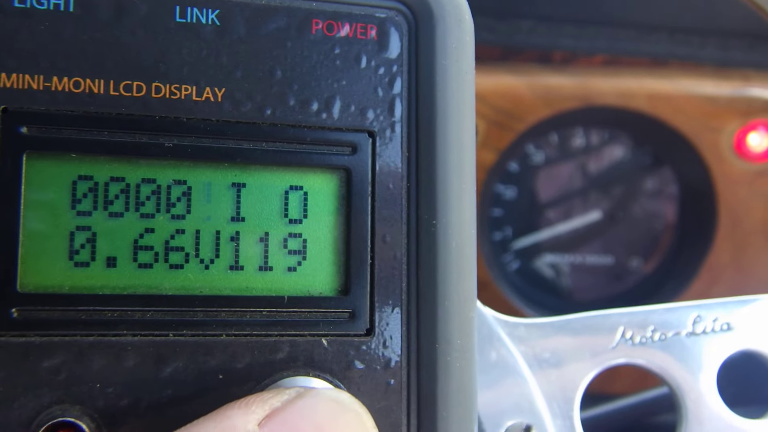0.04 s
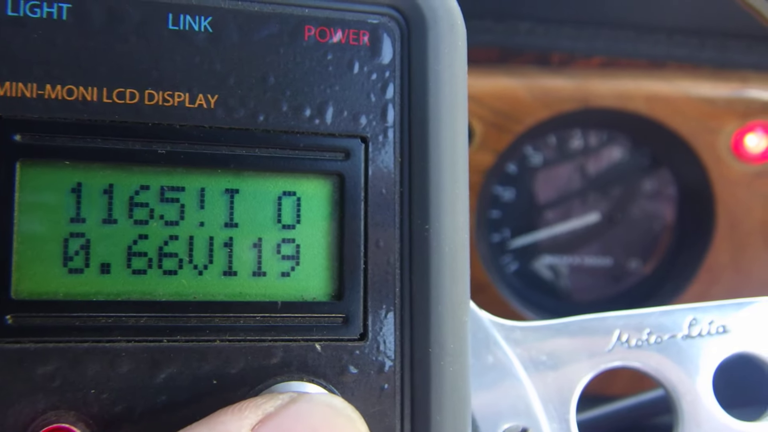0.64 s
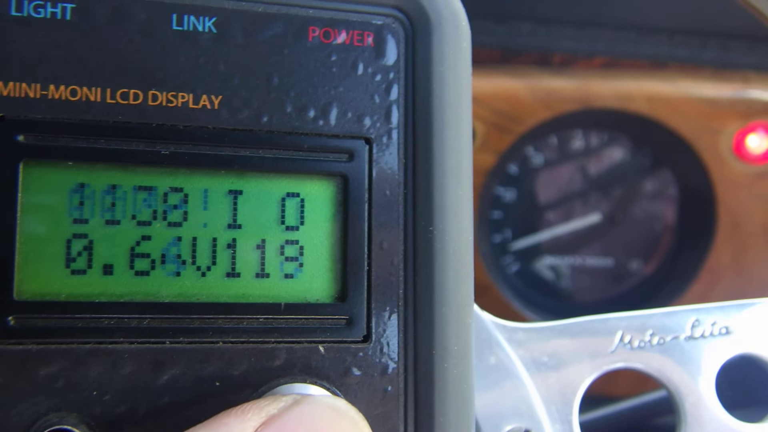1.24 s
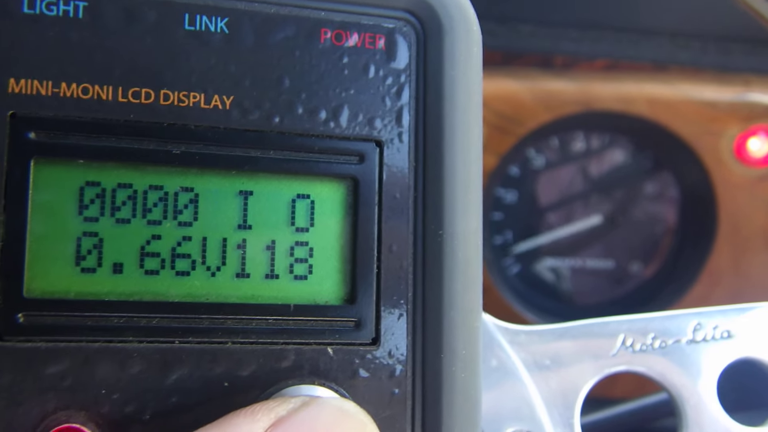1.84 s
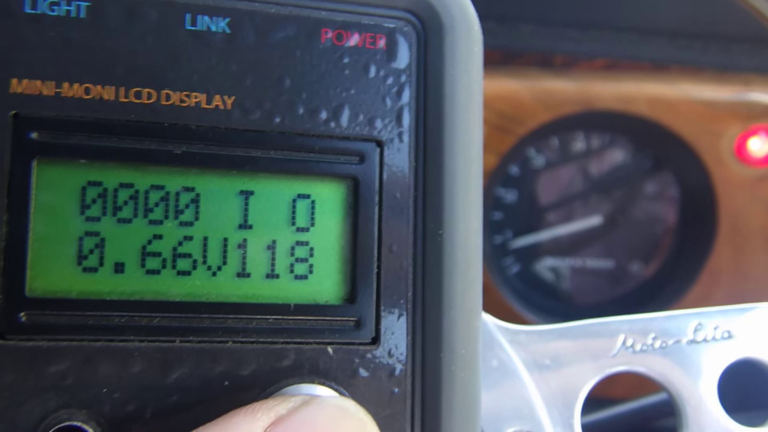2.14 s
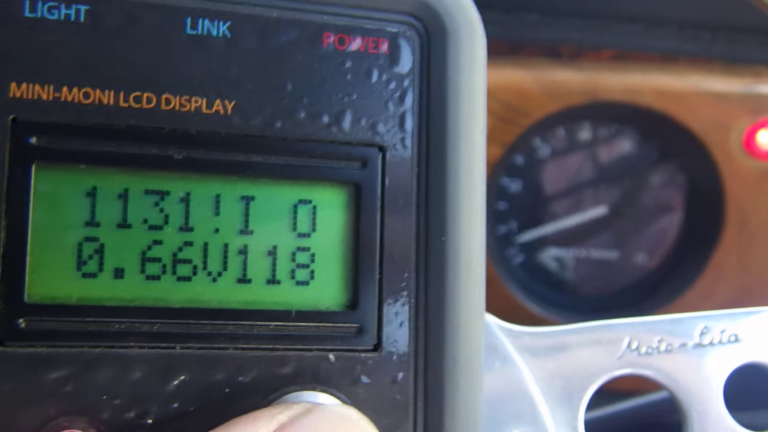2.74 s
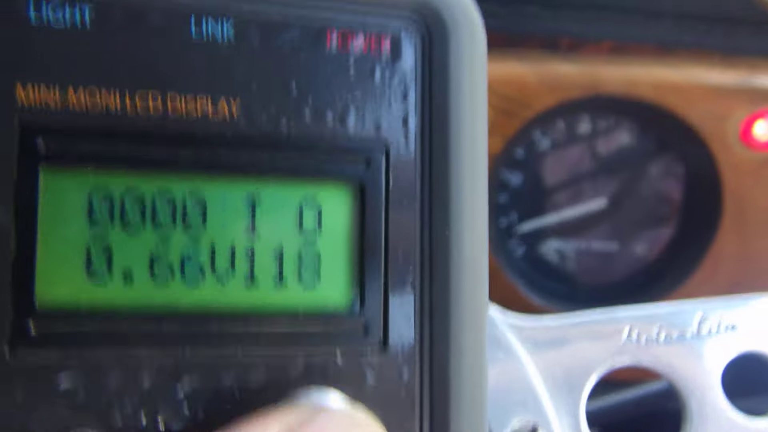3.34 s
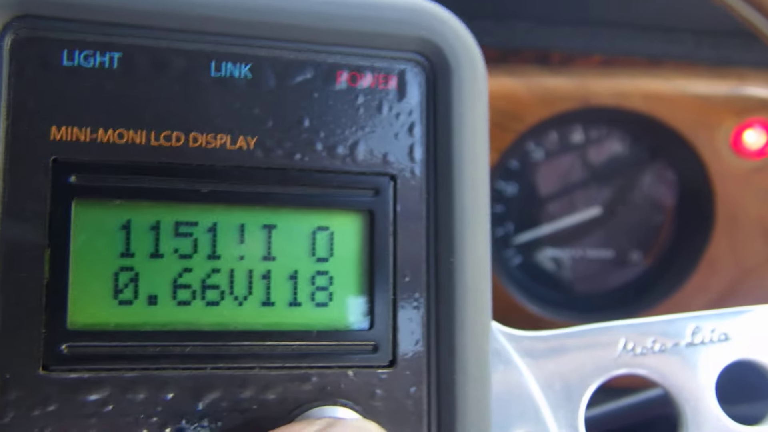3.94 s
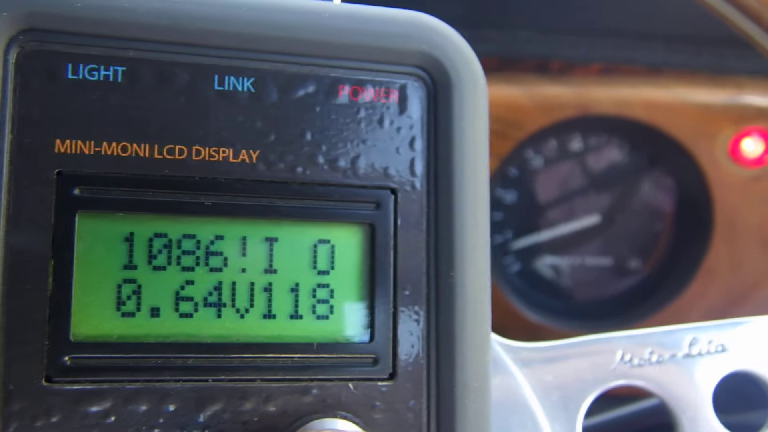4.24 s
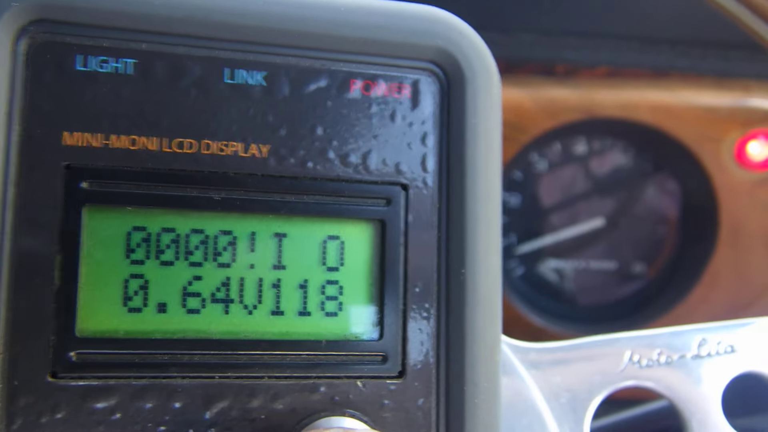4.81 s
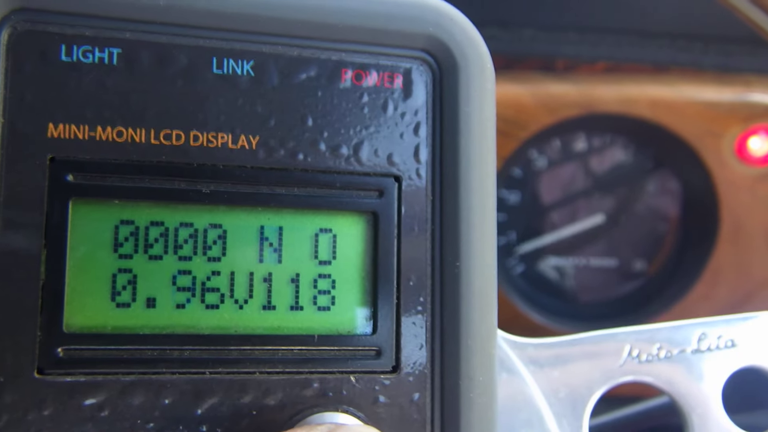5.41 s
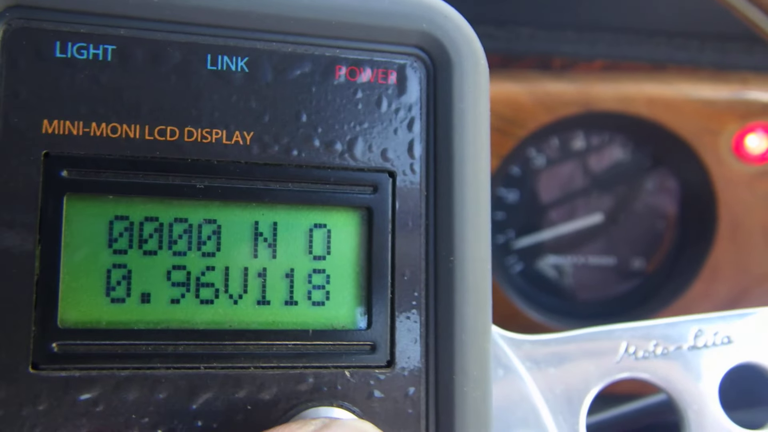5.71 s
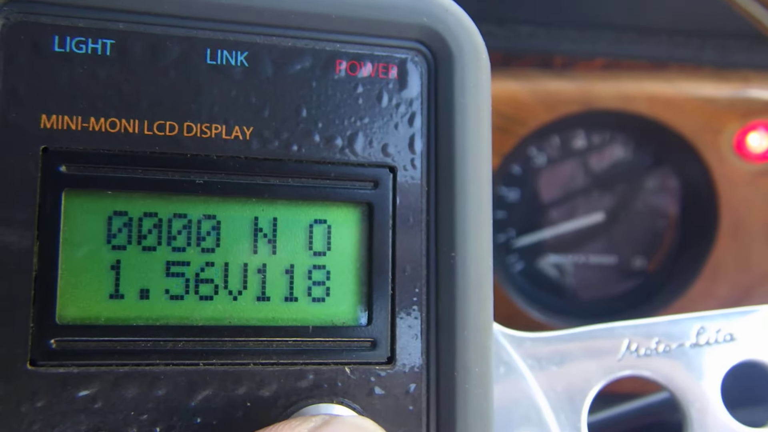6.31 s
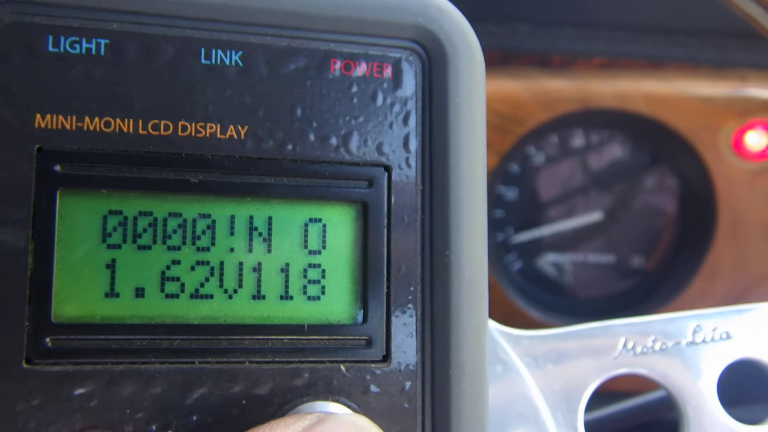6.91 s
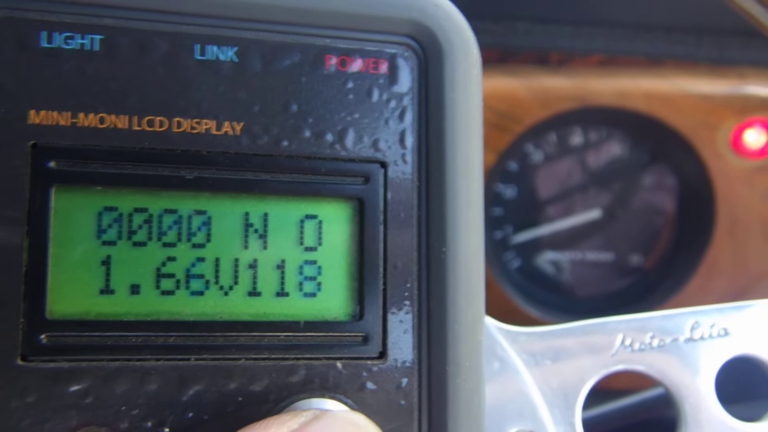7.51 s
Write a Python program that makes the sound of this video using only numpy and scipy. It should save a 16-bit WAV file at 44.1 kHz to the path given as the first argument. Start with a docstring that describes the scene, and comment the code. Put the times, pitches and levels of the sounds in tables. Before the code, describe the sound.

A small four-cylinder engine runs throughout, heard from the driver's seat in a workshop. For the first five seconds it idles lumpily, the low exhaust boom stumbling about four times a second, with valve clatter, a soft fan hiss and faint steady whines. Around 2.3 to 2.6 seconds, fingers rub a plastic tester close to the microphone, giving a cluster of crunchy clicks. Another rub and a sharp click come at 3.7 seconds, with lighter clicks at 4.3 and 5.3. The sharpest clicks briefly duck the whole sound. A few dull cabin knocks are scattered from 2.6 seconds on, the clearest at 4.1. From 5.1 seconds the engine catches, rises with a booming bark, then starves and slows. It surges again at about 5.6, 6.2, 6.8 and 7.5 seconds, with weak stray firings between, never reaching high revs.

```python
"""A car engine that cannot settle

A four-cylinder engine idles unevenly in a workshop, heard from the driver's seat. As the throttle
opens it catches, barks, starves and slows again, over and over. Exhaust pulses make the pipe boom
while the valve gear clatters on. A plastic tester held by the microphone clicks and rubs in the
hand, and the sharpest clicks make the automatic gain control turn everything down for a moment."""
import sys
import numpy as np
from scipy import signal
from scipy.fft import rfft, irfft, next_fast_len
from scipy.io import wavfile
from scipy.ndimage import uniform_filter1d

SR = 44100
rng = np.random.default_rng(int(sys.argv[2]) if len(sys.argv) > 2 else 0)


def file_out(sig):
    """Save sig as 16-bit WAV at sys.argv[1]."""
    # one column per channel
    cols = np.atleast_2d(sig).T
    # limit, then scale
    lim = np.clip(cols, -1, 1)
    pcm = np.round(lim * 32767).astype(np.int16)
    wavfile.write(sys.argv[1], SR, pcm)


N = 333385
TIME = np.arange(N) / SR

# strength of each cylinder, in firing order: level/dB
CYLINDER_LEVELS = [-1.3, 0.75, -2.4, 1]
# low resonances of silencer and cabin: f/Hz, width/Hz, level/dB
BOOM_RESONANCES = [(75.3, 20, 2), (116.2, 40, -1.5), (131.3, 6, -12)]
# tailpipe resonances: f/Hz, width/Hz, level/dB
BARK_RESONANCES = [(185.6, 31, 7), (212.8, 13, 1.5)]
# resonances that hard firings bring out: f/Hz, width/Hz, level/dB
RASP_RESONANCES = [(269, 21, 2.5), (340, 85, -3)]
# piston pumping swells as the firing rate nears a cabin resonance: f/Hz, level/dB
PUMP_LEVELS = [(30, -33), (35, -27), (38, -23), (41, -20.5), (45, -19.5), (51, -16)]
# weak firings let the idle speed sag: t/s, drop in firing rate/Hz
IDLE_STUMBLES = [(0.041, 7.06), (0.354, 5.76), (0.633, 4.86), (0.892, 6.64), (1.14, 4.3), (1.391, 6.61),
                 (1.629, 3.77), (1.881, 5.52), (2.124, 4.14), (2.378, 6.32), (2.609, 4.03), (2.86, 5.54),
                 (3.105, 3.42), (3.323, 6.4), (3.58, 2.97), (3.793, 6.27), (4.037, 4.05), (4.264, 2.87),
                 (4.457, 6.29), (4.695, 3.21), (4.961, 2.43), (5.103, 7.11)]
# the engine catches on the open throttle: t/s, burn length/s, firing rate it pulls towards/Hz
THROTTLE_SURGES = [(5.115, 0.242, 44.6), (5.62, 0.211, 52.1), (6.205, 0.193, 57.8), (6.825, 0.247, 55.6),
                   (7.5, 0.2, 51.9)]
# stray firings between surges: t/s, boom level/dB
STRAY_FIRINGS = [(5.48, -29.5), (6.07, -26), (6.75, -27), (7.41, -30.5)]
# clatter heard through the wall behind the engine: f/Hz, level/dB
CLATTER_SPECTRUM = [(200, -12), (300, -9), (370, -10), (440, -2.5), (520, 2.5), (610, -3), (720, 3),
                    (850, -6.5), (1100, -6.5), (1350, -4.5), (1530, -18), (1640, -12.5), (2100, -25),
                    (3000, -40.5)]
# valve gear and belt contacts: place in the cycle/firings, decay/ms, f/Hz, width/Hz, level/dB
VALVE_TAPS = [(0.17, 6.9, 547, 306, -28.5), (2.17, 4.2, 560, 460, -30.5), (0.78, 8.3, 1160, 480, -37.5),
              (0.56, 12, 2315, 260, -38), (1.6, 11.6, 2320, 280, -41.5), (2.65, 8.5, 2290, 440, -41.5),
              (3.5, 16, 2416, 250, -41.5), (0.88, 10, 3630, 100, -41), (1.7, 13, 3630, 120, -44),
              (3.9, 7.5, 3630, 91, -40.5), (3.52, 7, 3630, 240, -43), (0.76, 10, 4450, 190, -55.5),
              (1.5, 4.5, 4240, 920, -57), (2.72, 18, 4040, 890, -47.5)]
# clicks of the tester's case: t/s, level/dB, decay/ms, treble share/dB
CASE_CLICKS = [(2.398, -24, 23, -15), (2.43, -18.5, 17, -21), (2.47, -14, 12, -4), (2.617, -10, 8.3, 1),
               (3.691, -9, 3.6, -4), (4.117, -33, 11, -38), (4.275, -19.5, 8.1, -11.5),
               (4.703, -36.5, 11, -3), (5.262, -19, 4.8, -11)]
# resonances of the case: f/Hz, width/Hz, level/dB
CASE_RESONANCES = [(714, 150, 5.5), (1150, 360, 4), (1560, 175, -1), (2110, 730, 6), (2470, 380, 1),
                   (2780, 420, -9), (3540, 450, 3.5), (4460, 230, -6)]
# bright crack and rustle of the plastic: f/Hz, level/dB
PLASTIC_SPECTRUM = [(1000, -54), (2500, 8.5), (4600, -13.5), (6500, 3), (9000, -8), (12000, -7.5),
                    (15500, -13)]
# dull knocks in the cabin: t/s, level/dB, decay/ms
CABIN_KNOCKS = [(2.583, -24.5, 16), (3.686, -28, 6.5), (4.103, -19.5, 13.5), (5.527, -29.5, 13),
                (5.861, -39, 8.2), (6.765, -27.5, 5.6), (7.331, -27, 9)]
# fingers rubbing the case: middle t/s, half length/s, rustle level/dB, scrape level/dB
FINGER_RUBS = [(2.29, .07, -48, -53), (2.443, 0.052, -42, -31), (2.56, 0.12, -47.5, -43),
               (3.625, 0.061, -83, -31)]
# air intake and fan: f/Hz, level/dB
HISS_SPECTRUM = [(1500, 2.5), (2600, 8), (3500, 12), (3900, 6), (4550, 7), (5100, -12), (5800, -4),
                 (6400, -0.5), (7400, -10), (9700, -8), (14000, -8.5), (16000, -16)]
# faint steady whines and one thin, very high whistle: f/Hz, width/Hz, level/dB
STEADY_WHINES = [(1066, 13.2, -47), (1515, 20.6, -50.5), (2427, 10.3, -55), (3637, 35.5, -51.5),
                 (15636, 10, -74)]
# unmoving notches in the treble that hollow the whole sound: f/Hz, width/Hz
TREBLE_NOTCHES = [(3190, 1015), (4075, 145), (5170, 340), (5720, 390), (7130, 560), (8090, 68)]

IDLE_HZ = 40.947  # firings per second
BARK_IDLE_DB, BARK_STARVED_DB = -33, -40


def exhaust(crank, firing_hz):
    """Pistons pump air even when starved; burning fuel adds a boom and, under load, a bark and rasp."""
    boom_db, bark_db = combustion()
    pump_db = np.interp(firing_hz, *np.transpose(PUMP_LEVELS))
    pump = -np.sqrt(2) * np.cos(2 * np.pi * (crank - .05)) + .16 * band(noise(), 38, 34)
    lean = np.clip((firing_hz - 41) / 5, 0, 1)  # two cylinders run short of fuel as the speed rises
    boom = pipe(crank, BOOM_RESONANCES, 11 * lean, uneven_db=2, rough=.18, gust_ms=9)
    boom -= signal.sosfiltfilt(butter(2, 48), boom)  # the silencer gives off little deep bass
    boom = signal.filtfilt(*signal.iirnotch(99, 12, fs=SR), boom)  # 99 Hz cancels out at the seat
    boom = signal.sosfiltfilt(butter(3, 170), boom)
    # strokes that do not fire only puff
    airy = np.clip((BARK_IDLE_DB - bark_db) / (BARK_IDLE_DB - BARK_STARVED_DB), 0, 1)
    bark = pipe(crank, BARK_RESONANCES, 2.5 + 4 * lean, uneven_db=3.4, rough=.42 + .6 * airy, gust_ms=7)
    rasp = pipe(crank, RASP_RESONANCES, 14 * lean, uneven_db=2, rough=.3 + .6 * airy, gust_ms=5)
    bark, rasp = steady(signal.sosfiltfilt(butter(3, [145, 370], "band"), [bark, rasp]))
    rasp_db = 2.1 * (bark_db + 22) - 30  # harder pulses start more sharply
    low = from_db(pump_db) * pump + from_db(boom_db) * steady(boom)
    return low + from_db(bark_db) * bark + from_db(rasp_db) * rasp


def pipe(crank, resonances, lean_db, uneven_db, rough, gust_ms):
    """Each exhaust pulse and its gust of air ring the pipe; every second one is lean_db weaker."""
    at = moments(crank, 0, cycle=1)
    starved = np.arange(len(at)) % 2 == 0
    level_db = np.resize(CYLINDER_LEVELS, len(at)) - starved * lean_db[at]
    pulses = np.zeros(N)
    pulses[at] = from_db(level_db + uneven_db * rng.standard_normal(len(at)))
    gusts = np.sqrt(1 - decay_step(gust_ms) ** 2) * fade_after(pulses, gust_ms) * noise()
    flow = pulses + rough * gusts
    return sum(from_db(db) * ring(flow, hz, width) for hz, width, db in resonances)


def combustion(boom_starved_db=-31.5, catch_s=.026, run_on_s=.034, starve_s=.067):
    """Boom and bark levels in dB: the idle stumbles, then the engine starves between surges."""
    # 1 in a deep stumble (a 6 Hz drop), far less in a shallow one
    weak = sum((sag / 6) ** 2 * swell(s, .033) for s, sag in IDLE_STUMBLES)
    idling = TIME < THROTTLE_SURGES[0][0] + catch_s
    boom_db = np.where(idling, -17.5 - 7.5 * weak, boom_starved_db)
    bark_db = np.where(idling, BARK_IDLE_DB - 3.5 * weak, BARK_STARVED_DB)
    for s, db in STRAY_FIRINGS:
        boom_db += (db - boom_starved_db) * swell(s, .021)
    for s, burn_s, pull_hz in THROTTLE_SURGES:
        age = TIME - s + .012  # the first firing comes before the flywheel answers
        end_s = burn_s + run_on_s
        burning = np.interp(age, [0, catch_s, end_s, end_s + starve_s], [0, 1, 1, 0])
        burn_boom_db = -12 - 58 * np.maximum(age - .14, 0)  # holds, then fades as fuel runs short
        burn_bark_db = -27 + .6 * (pull_hz - 50)  # a harder pull barks louder
        boom_db += burning * (burn_boom_db - boom_db)
        bark_db += burning * (burn_bark_db - bark_db)
    return boom_db, bark_db


def engine_speed(pull_s=.142, coast_s=.307, stall_hz=24.865):
    """Firings per second: stumbles slow the idle; each surge spins the flywheel up, then it coasts."""
    speed = IDLE_HZ - sum(sag * swell(s, .062) for s, sag in IDLE_STUMBLES)
    for s, burn_s, pull_hz in THROTTLE_SURGES:
        for start, goal, lag_s in ((s, pull_hz, pull_s), (s + burn_s, stall_hz, coast_s)):
            later = TIME > start
            gap = np.interp(start, TIME, speed) - goal
            speed[later] = goal + gap * np.exp((start - TIME[later]) / lag_s)
    return speed


def clatter(crank, repeat_share=.55, throb_db=2):
    """Gear teeth and chain links meet in the same order every cycle; the rest rattles at random."""
    pattern = rng.standard_normal(1200)
    meshing = np.interp(crank / 4 % 1, np.linspace(0, 1, len(pattern)), pattern)
    repeating = np.sqrt(repeat_share) * coloured(meshing, CLATTER_SPECTRUM)
    rattle = np.sqrt(1 - repeat_share) * coloured(noise(), CLATTER_SPECTRUM)
    return (repeating + rattle) * from_db(throb_db * np.cos(2 * np.pi * (crank - .8)))


def valve_gear(crank, uneven_db=2):
    """Each contact taps once every four firings and rings its own part of the cylinder head."""
    taps = np.zeros(N)
    for place, decay_ms, hz, width, db in VALVE_TAPS:
        at = moments(crank, place, cycle=4)
        hits = np.zeros(N)
        hits[at] = from_db(db + uneven_db * rng.standard_normal(len(at)))
        taps += band(fade_after(hits, decay_ms) * noise(), hz, width)
    return taps


def tester_clicks(tail_db=-19, tail_ms=22, crack_db=-4):
    """The case slips in short crunches that ring the plastic and die away in the cabin."""
    body, crack = np.zeros(N), np.zeros(N)
    for s, db, decay_ms, treble_db in CASE_CLICKS:
        tail = from_db(tail_db) * burst(s, tail_ms)
        body += from_db(db) * (burst(s, decay_ms) + tail)
        crack += from_db(db + treble_db) * (burst(s, decay_ms * .66) + tail)
    crunch = body * noise()
    case = sum(from_db(db) * band(crunch, hz, width) for hz, width, db in CASE_RESONANCES)
    case /= np.sqrt(sum(from_db(db) ** 2 for _, _, db in CASE_RESONANCES))
    return case + from_db(crack_db) * crack * coloured(noise(), PLASTIC_SPECTRUM)


def cabin_knocks():
    """Dull knocks, each a quickly fading burst of noise."""
    bursts = sum(from_db(db) * burst(s, decay_ms) for s, db, decay_ms in CABIN_KNOCKS)
    return band(bursts * noise(), hz=720, width_hz=770)


def rubbing():
    """Skin sticks and slips on the plastic: a grainy rustle over a dull scrape."""
    rustle = sum(from_db(db) * swell(s, half_s) for s, half_s, db, _ in FINGER_RUBS)
    scrape = sum(from_db(db) * swell(s, half_s) for s, half_s, _, db in FINGER_RUBS)
    grains = noise() * from_db(2.1 * noise())
    return rustle * coloured(grains, PLASTIC_SPECTRUM) + scrape * band(rms_one(grains), 900, 1100)


def air_hiss(crank, effort_db):
    """The intake and fan hiss, pulsing with each firing and growing with speed."""
    level_db = -47 + .38 * effort_db + 1.2 * np.cos(2 * np.pi * (crank - .9))
    return from_db(level_db) * coloured(noise(), HISS_SPECTRUM)


def whines():
    """Narrow bands of noise make faint steady whines and one thin, very high whistle."""
    return sum(from_db(db) * band(noise(), hz, width) for hz, width, db in STEADY_WHINES)


def from_db(db):
    """Turn decibels into a gain."""
    return 10 ** (np.asarray(db) / 20)


def noise():
    """Fresh white noise."""
    return rng.standard_normal(N)


def rms_one(x):
    """Scale the average (rms) level to 1."""
    return x / np.sqrt(np.mean(x ** 2) + 1e-20)


def steady(x, size=SR // 13):
    """Even out the level over a few firings."""
    power = uniform_filter1d(uniform_filter1d(x ** 2, size), size)
    return x / np.sqrt(np.abs(power) + 1e-12)


def coloured(x, spectrum):
    """Shape a sound with a spectrum table, fading below its first row; the level comes out at 1."""
    hz, db = np.transpose(spectrum)
    size = next_fast_len(N)
    grid_hz = np.arange(size // 2 + 1) * SR / size + 1
    gain = from_db(np.interp(np.log(grid_hz), np.log(hz), db))
    gain *= np.minimum(1, grid_hz / hz[0]) ** 2
    return rms_one(irfft(rfft(x, size) * gain, size)[:N])


def butter(order, hz, kind="low"):
    """A smooth filter that keeps the lows, the highs or a band."""
    return signal.butter(order, hz, kind, fs=SR, output="sos")


def band(x, hz, width_hz):
    """Keep one band of frequencies, scaled so that white noise holds its level."""
    edges = [max(hz - width_hz / 2, 20), hz + width_hz / 2]
    return signal.sosfilt(butter(2, edges, "band"), x) * np.sqrt(SR / 2 / width_hz)


def ring(x, hz, width_hz):
    """A resonance: each click starts a fading tone."""
    r, w = np.exp(-np.pi * width_hz / SR), 2 * np.pi * hz / SR
    return signal.lfilter([0, np.sin(w)], [1, -2 * r * np.cos(w), r * r], x + 1e-18)


def decay_step(decay_ms):
    """The share of a fading level that is left after one sample."""
    return np.exp(-1000 / (decay_ms * SR))


def fade_after(hits, decay_ms):
    """Give every hit a fading tail."""
    return signal.lfilter([1], [1, -decay_step(decay_ms)], hits + 1e-18)


def burst(s, decay_ms):
    """A level that jumps up at time s and dies away."""
    age_ms = (TIME - s) * 1000
    return (age_ms >= 0) * np.exp(-np.clip(age_ms / decay_ms, 0, 40))


def swell(s, half_s):
    """A smooth bump of height 1 around time s."""
    return np.exp(-np.minimum(((TIME - s) / half_s) ** 2, 60))


def moments(crank, place, cycle):
    """Samples at which the engine passes a place in its cycle, both counted in firings."""
    return np.flatnonzero(np.diff(np.floor((crank - place) / cycle)) > 0)


def scene():
    """One crankshaft times the exhaust and clatter; clicks, knocks and rubs are added on top."""
    firing_hz = engine_speed()
    crank = np.cumsum(firing_hz) / SR - .35  # position, counted in firings
    effort_db = 9 * np.log2(firing_hz / IDLE_HZ)  # faster is louder
    background = air_hiss(crank, effort_db) + whines()
    machinery = from_db(effort_db - 31.5) * clatter(crank)
    machinery += from_db(.41 * effort_db) * valve_gear(crank)
    engine = exhaust(crank, firing_hz) + machinery
    return (engine + tester_clicks() + cabin_knocks() + rubbing() + background)[None]


def gain_control(x, threshold_db=-31, release_db_per_s=11, attack_ms=2):
    """Sharp treble pulls the volume down at once; then it creeps back."""
    treble = signal.sosfilt(butter(2, 5000, "high"), x)
    level_db = 10 * np.log10(np.abs(uniform_filter1d(treble ** 2, size=300)) + 1e-12)
    excess_db = np.maximum(level_db - threshold_db, 0)
    recovery_db = release_db_per_s * TIME
    duck_db = np.maximum.accumulate(excess_db + recovery_db, axis=-1) - recovery_db
    smooth_db = (1 - decay_step(attack_ms)) * fade_after(duck_db, attack_ms)
    return x * from_db(-smooth_db)


def record(dry):
    """Treble notches hollow the sound, the gain control acts and the highest treble is cut."""
    for hz, width in TREBLE_NOTCHES:
        dry = signal.lfilter(*signal.iirnotch(hz, hz / width, fs=SR), dry)
    top_cut = signal.ellip(10, .2, 80, 15750, fs=SR, output="sos")
    return signal.sosfilt(top_cut, gain_control(dry))


dry = scene()
out = record(dry)
file_out(out)
```